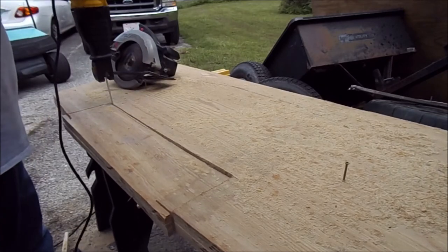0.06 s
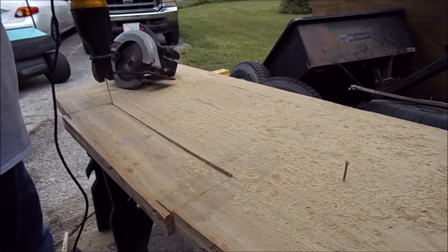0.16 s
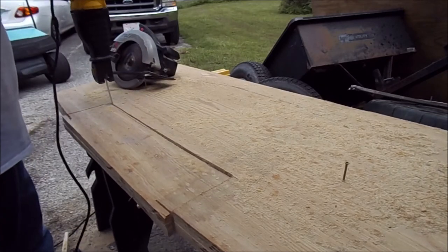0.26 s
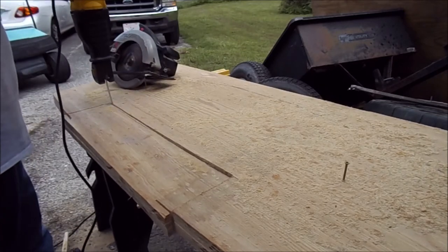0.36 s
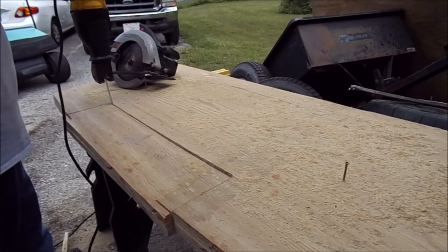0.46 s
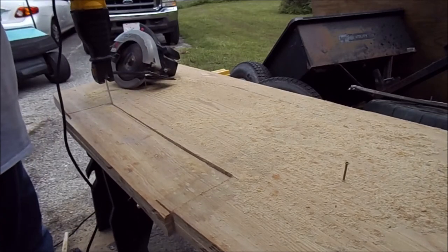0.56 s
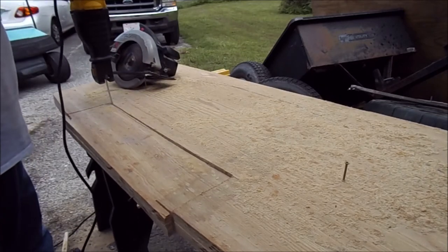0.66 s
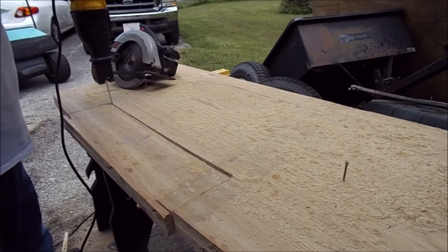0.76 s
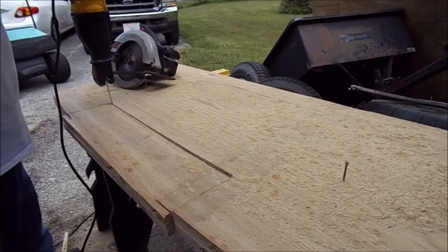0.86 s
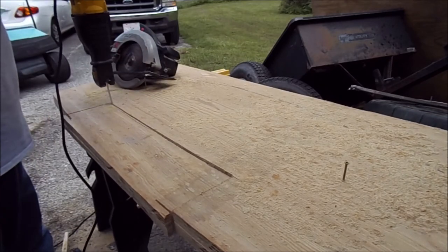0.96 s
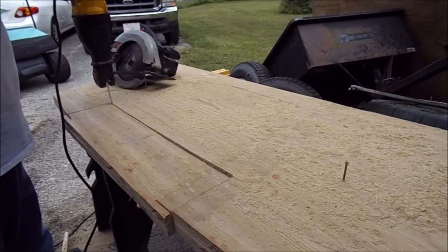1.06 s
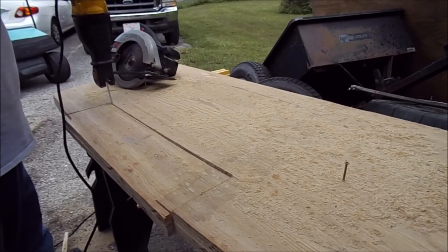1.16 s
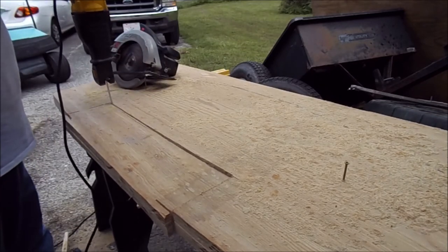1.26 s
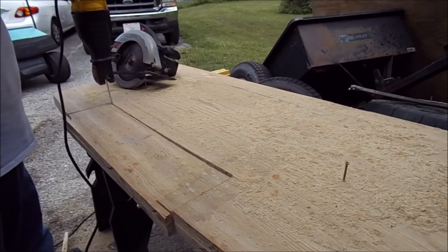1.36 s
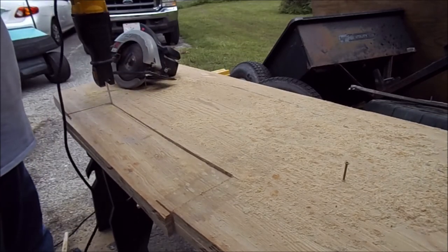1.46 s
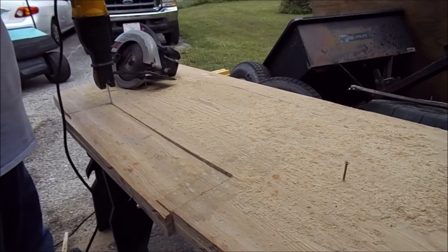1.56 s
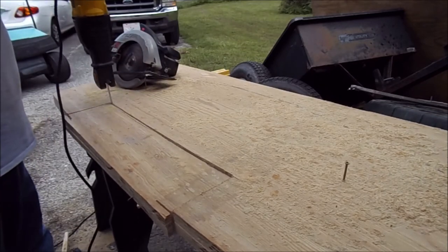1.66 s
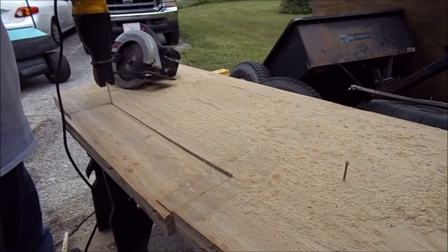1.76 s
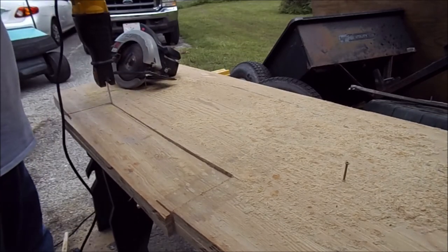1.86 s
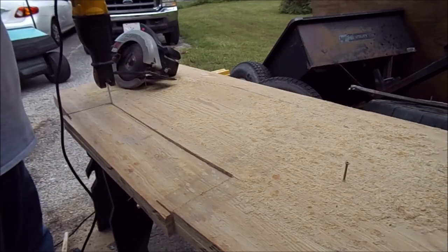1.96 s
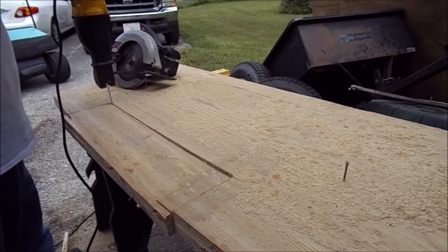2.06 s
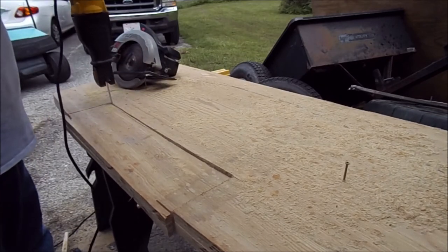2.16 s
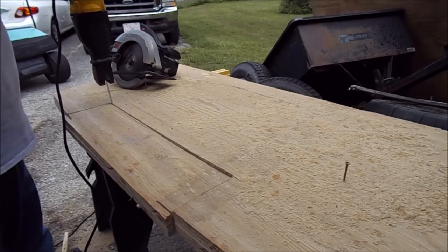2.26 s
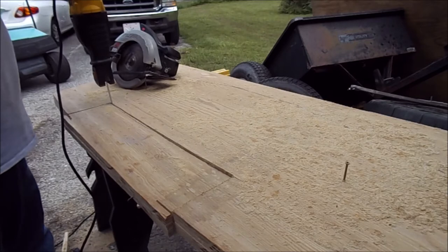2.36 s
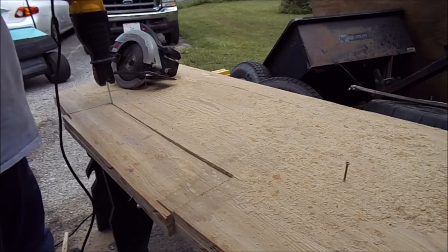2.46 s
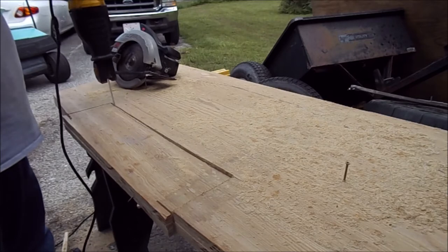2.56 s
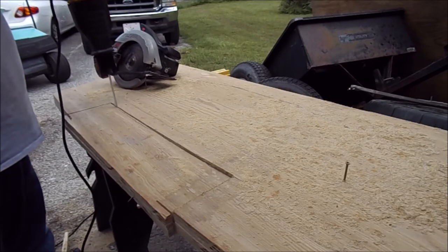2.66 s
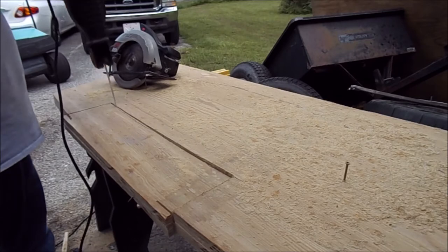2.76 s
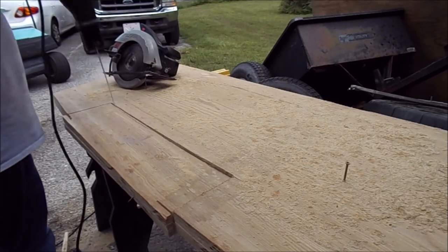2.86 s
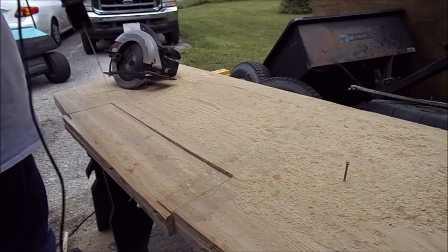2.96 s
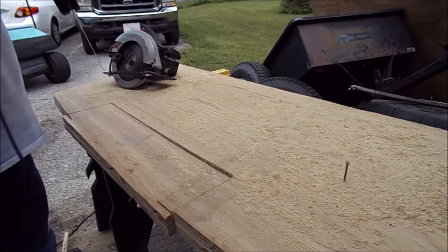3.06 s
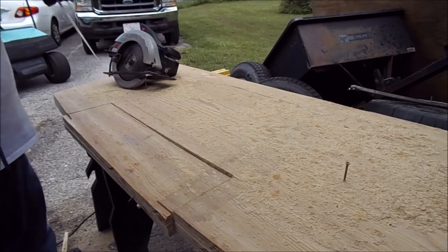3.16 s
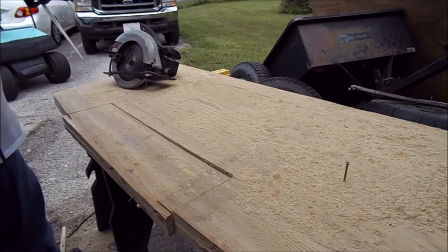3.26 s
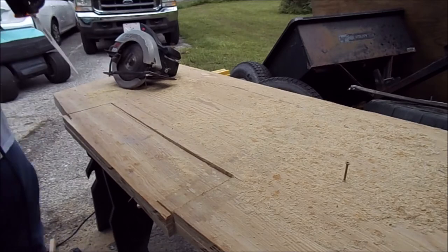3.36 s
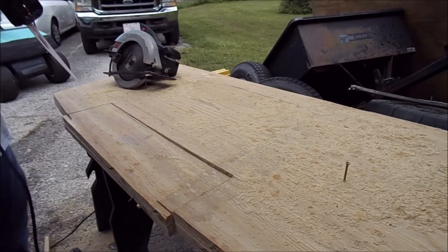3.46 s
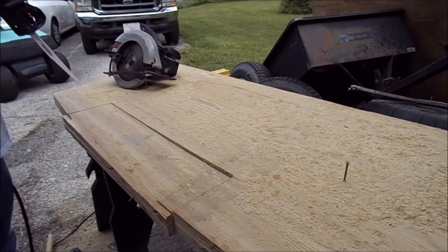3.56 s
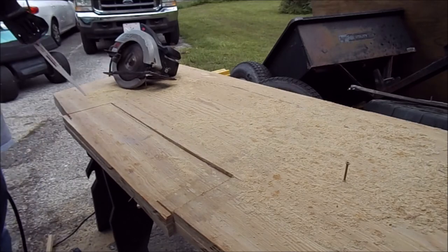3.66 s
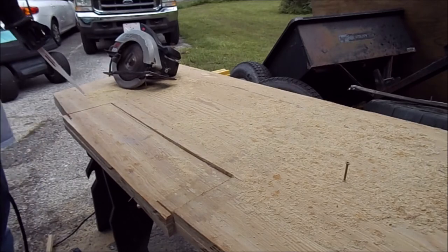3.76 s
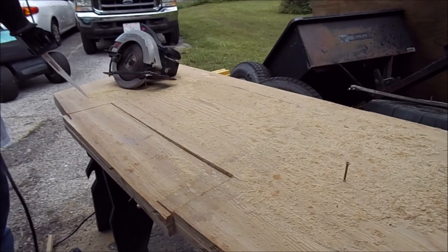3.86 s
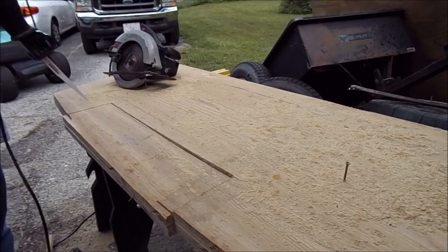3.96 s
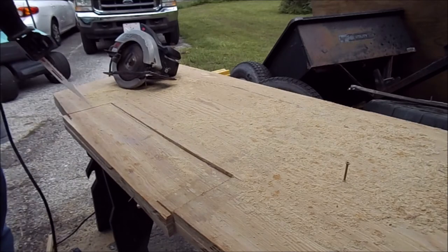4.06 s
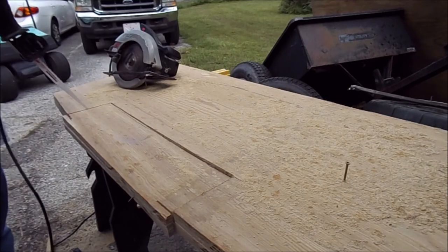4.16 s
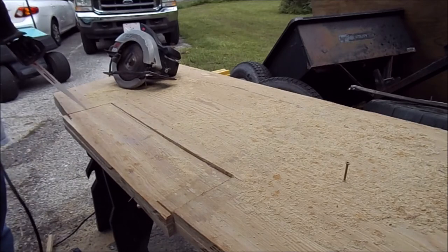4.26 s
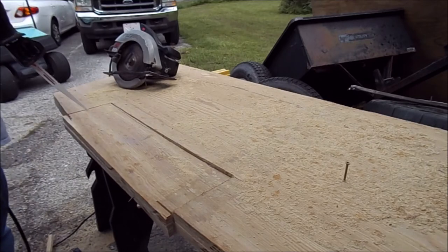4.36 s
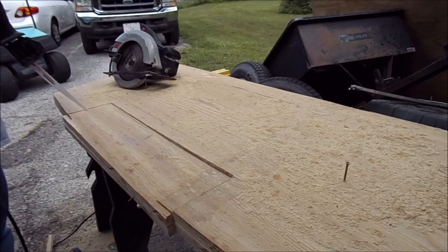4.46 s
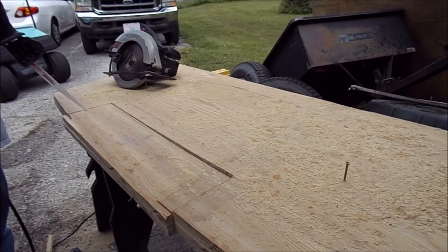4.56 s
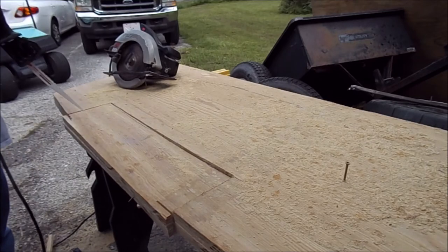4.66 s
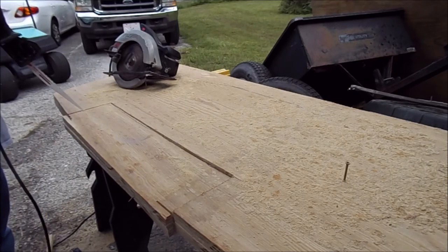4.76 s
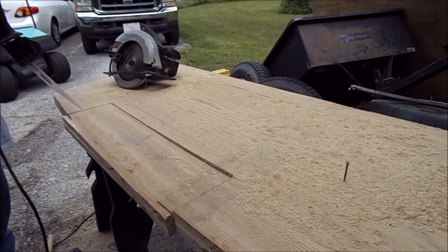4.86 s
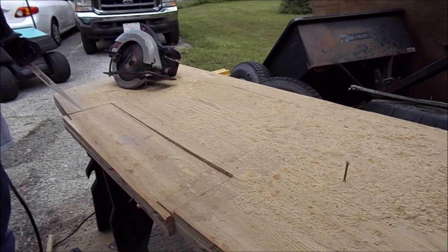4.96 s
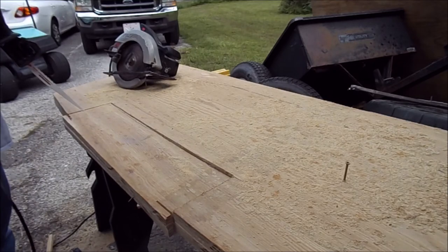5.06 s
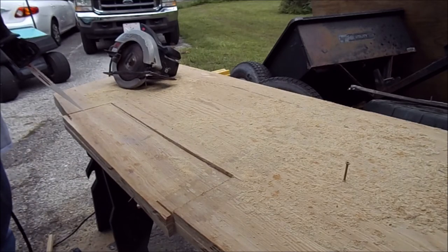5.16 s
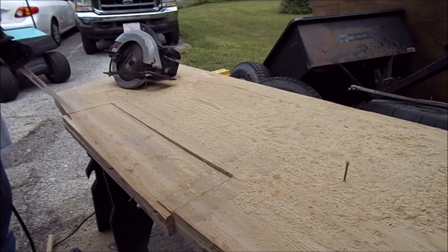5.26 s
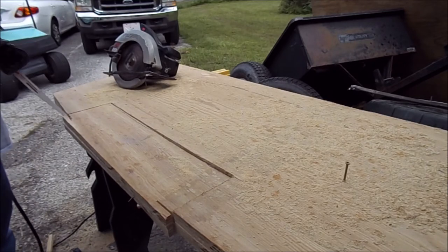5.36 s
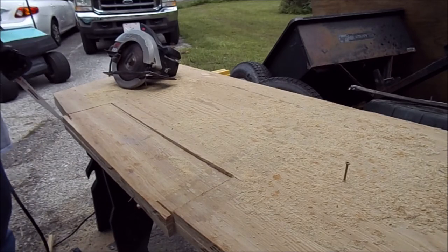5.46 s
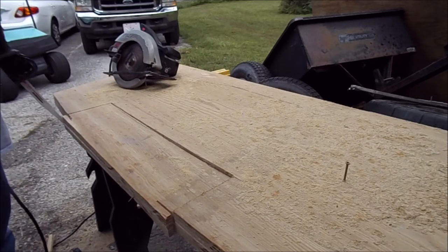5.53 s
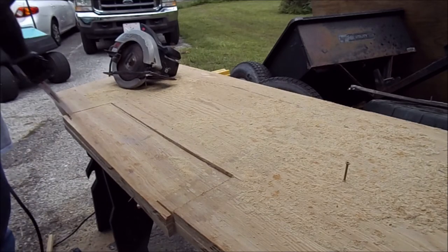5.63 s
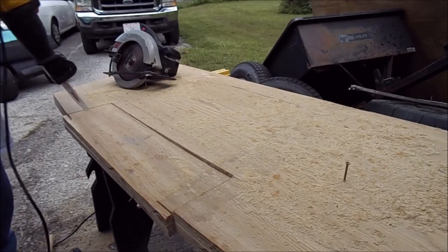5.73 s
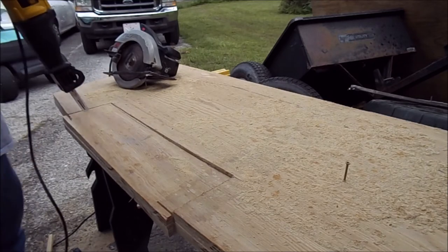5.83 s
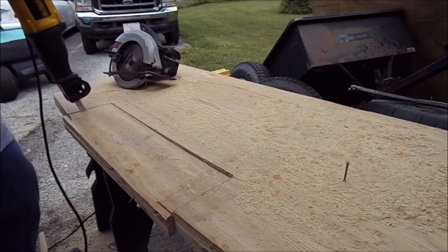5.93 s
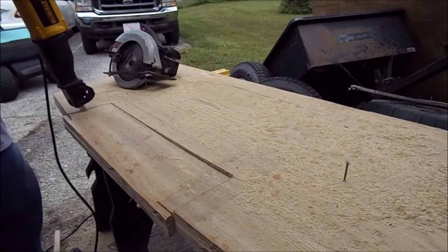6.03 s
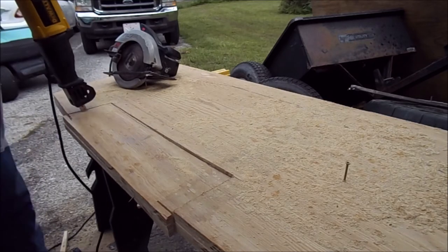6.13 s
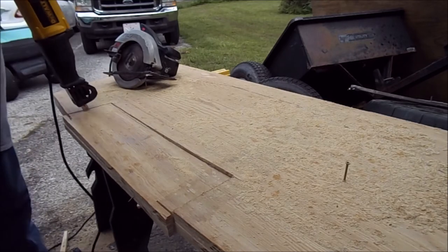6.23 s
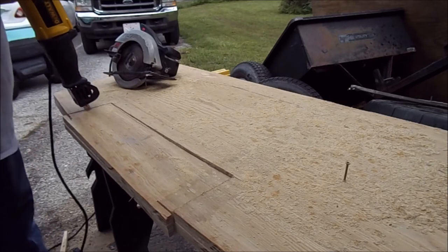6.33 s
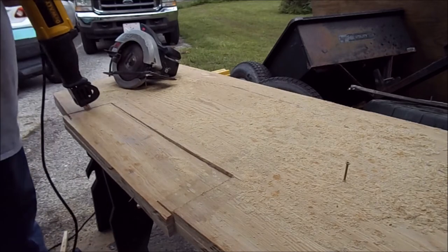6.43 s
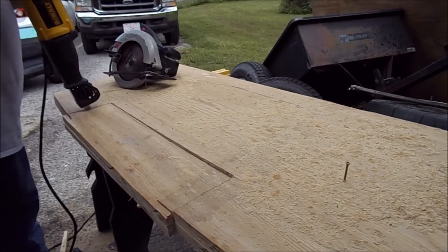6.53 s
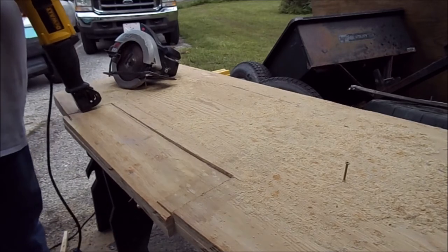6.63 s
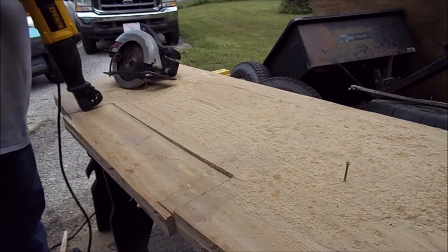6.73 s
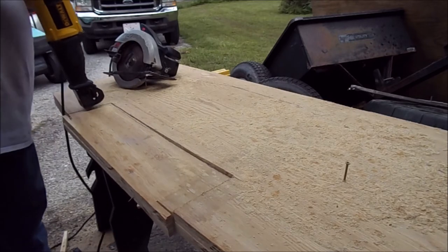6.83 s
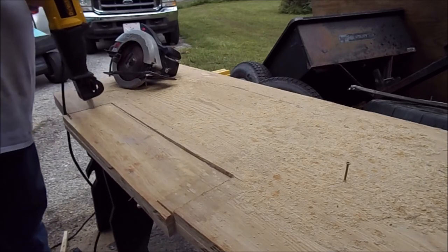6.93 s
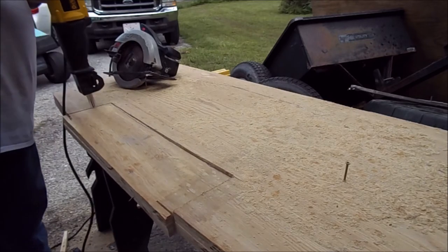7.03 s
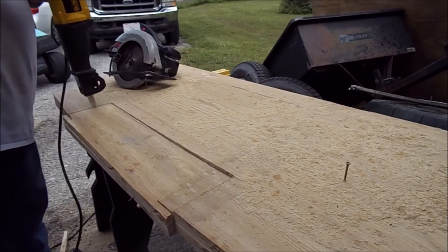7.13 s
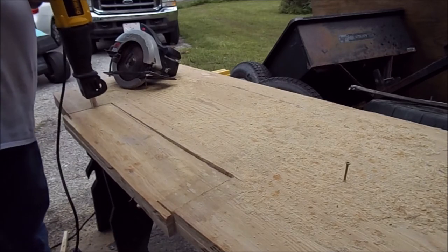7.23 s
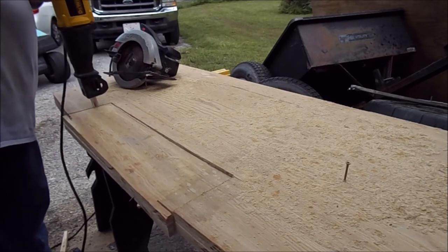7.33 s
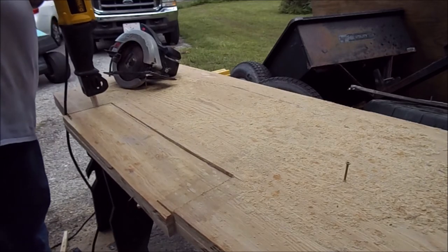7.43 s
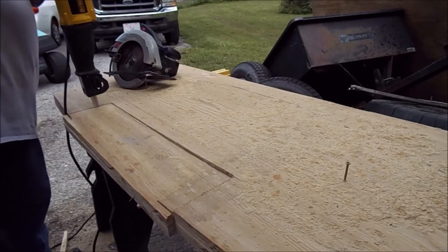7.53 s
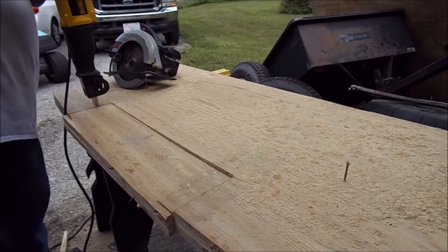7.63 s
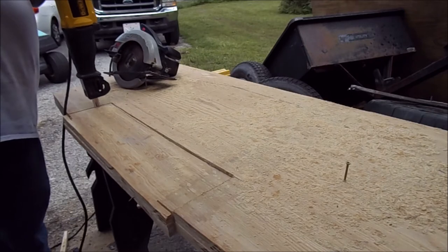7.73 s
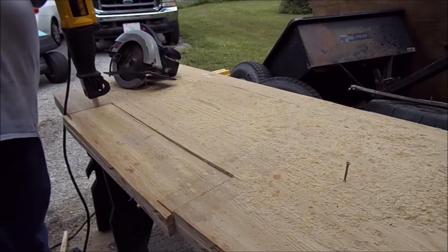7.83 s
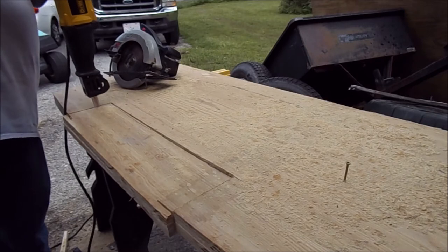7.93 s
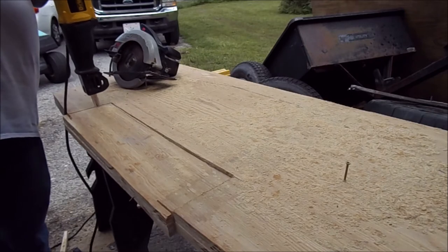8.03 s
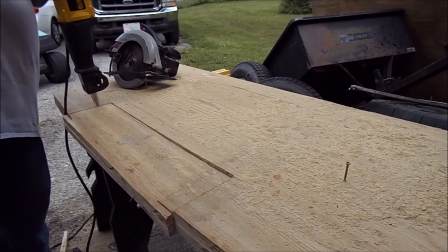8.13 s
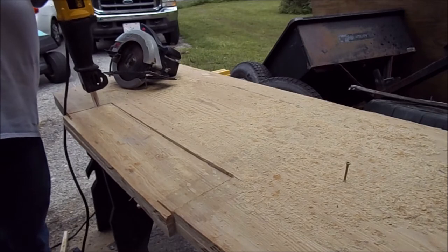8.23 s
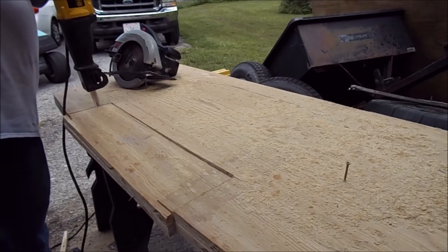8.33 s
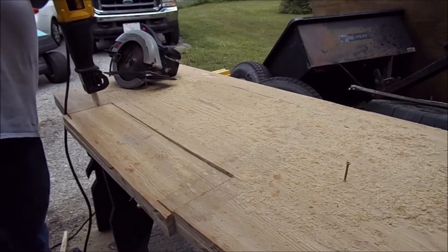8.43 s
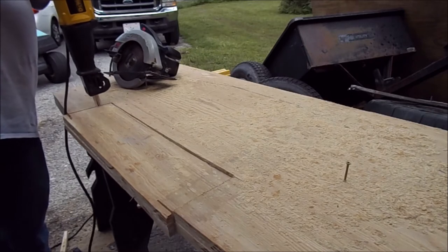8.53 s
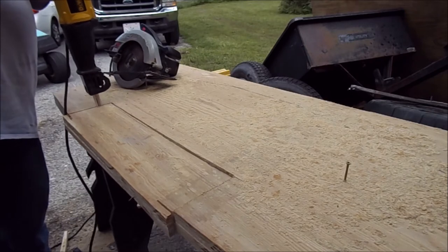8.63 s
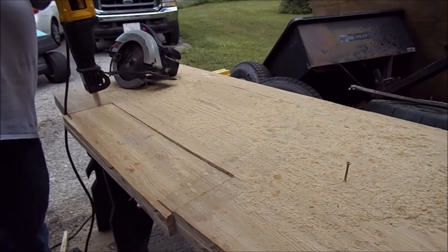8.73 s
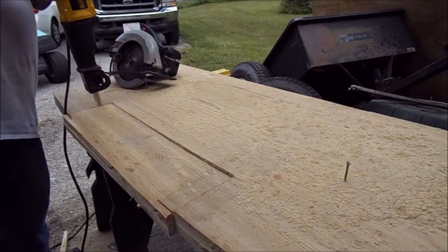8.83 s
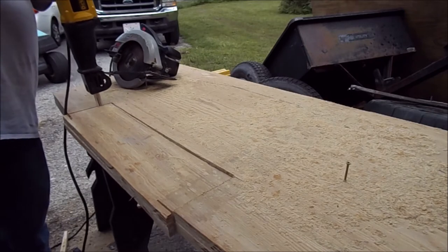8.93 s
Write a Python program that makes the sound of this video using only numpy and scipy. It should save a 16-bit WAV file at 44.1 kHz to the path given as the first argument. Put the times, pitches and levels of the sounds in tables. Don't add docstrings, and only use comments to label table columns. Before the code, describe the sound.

Outdoors and very close, harsh electric saw cutting of a plywood sheet stops, leaving light woody taps and scuffs before loud sawing abruptly resumes.

```python
import sys
import numpy as np
from scipy import signal
from scipy.io import wavfile
from scipy.ndimage import uniform_filter1d

SR = 44100
rng = np.random.default_rng(int(sys.argv[2]) if len(sys.argv) > 2 else 0)


def file_out(sig):
    cols = np.atleast_2d(sig).T
    lim = np.clip(cols, -1, 1)
    pcm = np.round(lim * 32767).astype(np.int16)
    wavfile.write(sys.argv[1], SR, pcm)


def level_to_linear(level):
    exponent = np.asarray(level, float) / 20
    return 10 ** exponent


N = 396459

# f/Hz, density level/dB per Hz
WOOD_SPECTRUM = [(150, -65), (250, -23), (493, -0.5), (1170, 2), (1790, 1), (3210, -2.5), (3570, -8),
                 (3870, -10.5), (6000, -23), (7800, -39), (13200, -120)]
# f/Hz, density level/dB per Hz
AIR_SPECTRUM = [(2060, -34.5), (3500, -10.5), (4190, -17), (5120, -9), (5660, -8.5), (8430, -10),
                (9730, -9.5), (10800, -13.5), (12000, -11.5), (15500, -24.5)]
# f/Hz, width/Hz, level/dB
BLADE_MODES = [(1800, 300, 2), (3000, 400, 2), (4100, 400, -4)]
TRIGGER_ON_S, TRIGGER_OFF_S = (-.356, 6.475), 2.355
FULL_HZ = 3900
CONTACT = np.arange(600) / 60.


def evened(x):
    return x / np.sqrt(np.mean(x ** 2) + 1e-20)


def steadied(x):
    return x / np.sqrt(abs(uniform_filter1d(x ** 2, size=11025)) + 1e-12)


def along(points):
    s, *columns = np.transpose(points)
    return [np.interp(np.arange(N) / SR, s, c) for c in columns]


def colour(x, points=None, peaks=(), peak_db=0):
    hz = abs(np.fft.fftfreq(8192, 1 / SR))
    gain = np.zeros(len(hz)) + 1e-5
    if points:
        f, db = np.transpose(points)
        curve_db = np.interp(np.log(hz + 1), np.log(f + 1), db)
        bass_loss_db = 47 * np.log10(np.maximum(f[0] / (hz + 1), 1))
        gain += level_to_linear(curve_db - bass_loss_db)
    for f, width, db in peaks:
        gain += level_to_linear(db + peak_db) / (1 + (2 * (hz - f) / width) ** 2)
    level = np.log(gain)
    phase = -signal.hilbert(level).imag
    taps = np.fft.ifft(np.exp(level + 1j * phase)).real[:4096]
    return signal.oaconvolve(x, taps)[:len(x)]


def wander(per_s):
    at = np.arange(0, N / SR + 1, 1 / per_s)
    return np.interp(np.arange(N) / SR, at, rng.standard_normal(1000)[:len(at)]) * 1.22


def clicks(per_s, spread_db):
    when, size, sign = rng.random((3, N))
    return (when < per_s / SR) * level_to_linear(-spread_db * np.log(size + 0.024)) * np.sign(sign - .5)


def passings(cycles):
    return np.diff(np.floor(cycles), prepend=0) > 0


def yard():
    # f/Hz, density level/dB per Hz
    hum_spectrum = [(21, -61), (35, -23), (60, -11), (150, -3), (249, -8), (283, -3), (330, -7), (849, 0),
                    (2410, -10), (6530, -17.5), (15500, -22.5)]
    return level_to_linear(-56 + 1.1 * wander(10)) * evened(colour(rng.standard_normal(N), hum_spectrum))


def scrape():
    # t/s, length/s, level/dB, treble minus that level/dB
    slides = [(3.963, 0.085, -29.5, -13.5), (4.097, 0.085, -49, -20), (4.279, 0.084, -47, -4.5),
              (4.42, .12, -55, -18), (5.1, .08, -59, -14), (5.143, 0.084, -47.5, -3.5),
              (5.264, 0.21, -47.5, -11), (5.535, 0.23, -48, -20), (5.69, .3, -36, -12.5),
              (6.01, .12, -44, -11.5), (6.19, .15, -45.5, -18), (6.462, 0.072, -31, -16.5)]
    rise_s, fall_s = 0.0083, 0.027
    t, wood, treble = np.arange(N) / SR, 0, 0
    for s, length, db, treble_db in slides:
        rise = np.clip((t - s) / rise_s, 0, 1)
        press = rise * np.exp(-np.maximum(t - s - length, 0) / fall_s)
        wood = wood + level_to_linear(db - 7.5) * press
        treble = treble + level_to_linear(db - 10 + treble_db) * press
    grains = clicks(1100, spread_db=2.5) + 0.2 * rng.standard_normal(N)
    return wood * evened(colour(grains, WOOD_SPECTRUM)) + treble * evened(colour(grains, AIR_SPECTRUM))


def knocks():
    # t/s, peak level/dB, f/Hz, treble minus peak/dB
    taps = [(3.169, -12, 2170, -20.5), (3.699, -33.5, 1220, -19), (3.777, -22.5, 1460, -20),
            (3.818, -26, 1270, -26), (4.17, -43, 1110, -24), (4.22, -30.5, 1010, -32),
            (4.271, -42, 2200, -6), (4.303, -23, 2870, -17), (4.414, -34.5, 2370, -28),
            (4.547, -36, 1400, -8), (4.576, -18, 1000, -22.5), (5.72, -16.5, 1880, -12.5),
            (5.971, -22, 1990, -30), (6.086, -24, 2880, -15), (6.133, -38, 1500, -25),
            (6.167, -32, 2250, -25), (6.272, -27.5, 2200, -33), (6.31, -31, 2280, -29),
            (6.426, -40, 1480, -11), (6.455, -18.5, 1980, -18)]
    # t/s, peak level/dB, f/Hz, treble minus peak/dB
    scuffs = [(4.296, -25.5, 2860, -13), (4.327, -27, 3460, -18), (4.337, -42, 3230, -24),
              (5.115, -49, 999, -4.5), (5.177, -25.5, 1440, -11), (5.362, -29.5, 1520, -26),
              (5.399, -38, 1810, -15), (5.439, -35, 1170, -4), (5.708, -21, 2020, -14.5),
              (5.739, -29, 853, -20), (5.76, -21, 1700, -23), (5.783, -14, 1800, -28),
              (5.787, -19, 2970, -22), (5.824, -26, 1810, -27), (5.88, -24.5, 1800, -28),
              (5.895, -19.5, 3400, -18), (5.91, -24, 1710, -22), (5.929, -25, 1500, -22.5),
              (5.944, -24.5, 2170, -22.5), (6.058, -28, 566, -27), (6.192, -39, 689, -23),
              (6.218, -36, 1420, -23), (6.49, -23, 2390, -17), (6.53, -11.5, 1940, -27)]
    # t/s, peak level/dB
    thuds = [(2.62, -36), (2.77, -39), (4.02, -50), (5.74, -41), (5.8, -42), (6.06, -55), (6.56, -31)]
    tap_s, scuff_s, ring_t60_s = 0.00063, 0.0036, 0.031
    thud_hz, thud_t60_s = 220, .06
    out, t = np.zeros(N + SR), np.arange(6000) / SR
    touches = [(*row, tap_s) for row in taps] + [(*row, scuff_s) for row in scuffs]
    for (s, db, hz, treble_db, contact_s), noise in zip(touches, rng.standard_normal((60, 2, 6000))):
        touch = noise[0] * t * np.exp(-t / contact_s)
        modes = BLADE_MODES + [(hz, 2.2 / ring_t60_s + 120, 12)]
        ring = colour(touch, WOOD_SPECTRUM, modes, peak_db=2)
        tick = colour(touch, AIR_SPECTRUM)
        fade = level_to_linear(-17.5 - 60 * t / (4.5 * ring_t60_s)) * np.minimum(t / 0.0026, 1)
        tail = evened(colour(noise[1], WOOD_SPECTRUM)) * fade
        sound = ring / abs(ring).max() + level_to_linear(treble_db) * tick / abs(tick).max() + tail
        out[round(s * SR):][:len(t)] += level_to_linear(db) * sound
    for s, db in thuds:
        fade = level_to_linear(db - 60 * t / thud_t60_s) * np.minimum(t / .006, 1)
        out[round(s * SR):][:len(t)] += fade * np.sin(2 * np.pi * thud_hz * t)
    return out[:N]


def speed():
    # t/s, commutator bars passing a brush f/Hz
    held_speed = [(0.9, 3765), (1.3, 3792), (2.2, 3934), (7.9, 3960), (8.2, 4006), (8.5, 3927),
                  (8.99, 3891)]
    spin_up_s, coast_s, dry_drag_hz = .17, 2.08, 2660
    kerf_s, kerf_length_s, kerf_loss_hz = 2.7, .16, 120
    t, held = np.arange(N) / SR, along(held_speed)[0]
    since = t - np.where(t < TRIGGER_ON_S[1], *TRIGGER_ON_S)
    driven = held * (1 - np.exp(-since / spin_up_s))
    coasting = (held + dry_drag_hz) * np.exp(-(t - TRIGGER_OFF_S) / coast_s) - dry_drag_hz
    coasting -= kerf_loss_hz * np.exp(-((t - kerf_s) / kerf_length_s) ** 2)
    released = (t > TRIGGER_OFF_S) & (t < TRIGGER_ON_S[1])
    return np.maximum(np.where(released, coasting, driven), 90)


def levels(bar_hz, load):
    # level/dB at full speed and load, slope/dB per decade, loss/dB unloaded,
    # gain/dB in the second cut
    loudness = [
        (-9, 31.5, 4, 0),
        (-17, 24.5, 0, -7.5),
        (-21.5, 39, -1, 1.5),
    ]
    # t/s, level/dB
    bite = [(0, -1), (0.2, 2), (1.7, -1), (2.12, -10), (2.8, -10), (6.5, 0.5), (7.8, -1.5), (8.99, 1.5)]
    # t/s, gear case level/dB, sheet level/dB
    snags = [(0.019, 3.5, 4), (.72, 1, 2), (.85, 5.5, -3), (1.299, 0, 6.5), (1.96, -2, 10),
             (2.055, -2.5, 12.5), (2.774, 9, 13.5), (3.11, -2.5, 4), (6.534, 13.5, 1), (6.58, 9, 7),
             (6.603, 12.5, 5), (6.648, 4.5, 0.5), (6.685, 11.5, -5), (6.724, 7.5, -1.5), (6.757, 1, 0.5),
             (6.78, 1, 5), (6.82, 1, 0), (6.852, 1, -0.5), (6.881, 2, 4), (6.911, 1.5, 1), (6.94, 3, 5),
             (8.4, 0, 6.5), (8.67, 2, 6), (8.77, 2, 5)]
    snag_s = [
        [0.0078],
        [0.016],
    ]
    t = np.arange(N) / SR
    case, sheet, air = (db + per * np.log10(bar_hz / FULL_HZ) - free * (1 - load)
                        + second * (t > TRIGGER_ON_S[1]) for db, per, free, second in loudness)
    swell = sum(np.c_[db] * np.exp(-((t - s) / snag_s) ** 2) for s, *db in snags)
    return case + swell[0], sheet + swell[1] + along(bite)[0], air


def motor(bars, bar_hz, load, jolt, rattle):
    # f/Hz, width/Hz, level/dB
    vents = [(4700, 700, 2), (6200, 900, 6), (7500, 700, -1), (9300, 1000, -1), (10800, 600, 1),
             (11700, 800, -4)]
    # multiple of the commutator rate, level/dB
    gear_orders = [(2.35, -1), (2.43, 4), (2.52, 2), (2.963, 3), (3.05, -2), (3.135, -4)]
    flow = (1 + 1.5 * load * jolt) * level_to_linear(0.31 * wander(80)) * rng.standard_normal(N)
    hiss = steadied(colour(flow + 0.23 * load * rattle, AIR_SPECTRUM))
    tones = 0
    for k in range(2, 17):
        if k != 3:
            strength = level_to_linear(2.5 * wander(12) - 1) * (k * bar_hz < 15000) * (1 + .5 * (k == 6))
            tones = tones + strength * np.sin(2 * np.pi * k * bars)
    strain = np.minimum(bar_hz / 3000, 1) ** 2 * (0.52 + 0.3 * load)
    for k, db in gear_orders:
        tones += strain * level_to_linear(db + 3 * wander(14)) * np.sin(2 * np.pi * k * bars + 1.6 * wander(90))
    whine_db = -12 + 6 * (1 - bar_hz / FULL_HZ)
    return hiss + level_to_linear(whine_db) * colour(tones, peaks=vents)


def stroke_thump(strokes, bar_hz, load):
    # multiple of the stroke rate, level/dB
    stroke_orders = [(3, -47), (4, -52), (5, -42), (6, -48), (7, -43), (8, -52), (9, -44), (10, -45),
                     (11, -46), (12, -44), (13, -40), (14, -39), (16, -36), (18, -34)]
    tones = sum(level_to_linear(db + 1.2 * wander(6)) * np.sin(2 * np.pi * k * strokes) for k, db in stroke_orders)
    return load ** 1.5 * (bar_hz / FULL_HZ) ** 3 * tones


def plywood_sheet(drive, strokes, bar_hz, load, jolt, first):
    # f/Hz, width/Hz, level/dB
    sheet_modes = [
        [(495, 8, 0), (569.4, 13, 3), (664, 39, -3), (758, 26, 1.5)],
        [(488.6, 13, -3), (554, 18, -1), (651, 23, 7.5), (729, 55, -7)],
    ]
    # f/Hz, density level/dB per Hz
    sheet_spread = [(24, -70.5), (40, -64), (181, -28), (289, -12), (564, -7.5), (679, -5), (750, 1),
                    (983, -5), (1200, -4.5), (1560, -33.5), (2640, -120)]
    kicks = passings(strokes + .015 * wander(20)) * level_to_linear(2.5 * wander(25))
    chatter = clicks(bar_hz * .3 * (0.44 + jolt), spread_db=-2.5)
    shake = 0.43 * load * evened(kicks) + evened(chatter)
    ringing = np.where(first, *(colour(shake, sheet_spread, p, peak_db=9) for p in sheet_modes))
    unloaded = colour(colour(drive, sheet_spread), WOOD_SPECTRUM)
    return steadied(load * evened(ringing) + (1 - load) * evened(unloaded))


def gear_drive(bars, bar_hz, load, jolt):
    turns = passings(bars / 11.5 + .15 * wander(70))
    extra_per_s = 110 + bar_hz * .12 * (.6 + load * np.minimum(jolt, 2))
    clacks = turns + .7 * abs(clicks(extra_per_s, spread_db=0))
    clacks = clacks * level_to_linear((1.5 + load) * wander(90))
    bursts = signal.oaconvolve(clacks, CONTACT * np.exp(-CONTACT))[:N]
    rattle = steadied(bursts * rng.standard_normal(N))
    tear = evened((.6 + (.2 + .9 * load) * jolt) * rng.standard_normal(N))
    dry_bursts = signal.oaconvolve(clacks, np.exp(-CONTACT / .9))[:N]
    ticking = steadied(dry_bursts * rng.standard_normal(N))
    drive = .6 * load * rattle + .8 * (1 - load) * ticking + tear * (.45 + .45 * load)
    return rattle, drive


def gear_case(drive, loose, load, first):
    # f/Hz, density level/dB per Hz
    case_spectra = [
        [(470, -44), (800, -11), (1240, -17.5), (1380, -6), (1580, -9.5), (1970, -1.5), (2860, -8), (3560, -10.5), (4540, -17.5), (6000, -24.5), (7800, -45), (13200, -120)],
        [(290, -56.5), (500, -13), (669, -8), (841, 5.5), (1650, 5.5), (2480, 4.5), (2780, -9), (3180, -2.5), (3800, -5), (6000, -10), (7800, -11.5), (13200, -120)],
        [(470, -54.5), (800, -10.5), (939, -5), (1070, -10), (1240, -3), (1570, -4.5), (2310, -0.5), (3010, -1), (4700, -14.5), (6000, -24.5), (7800, -45), (13200, -120)],
    ]
    # f/Hz, width/Hz, level/dB
    case_peaks = [
        [(1151, 54, -7), (1400, 64, -3), (1980, 70, -16), (2290, 18, 5), (3120, 15, -5.5), (3470, 270, -9.5)],
        [(1080, 250, -7.5), (1550, 260, -9), (2550, 300, 12.5), (3094, 190, 10.5)],
        [(1420, 30, -5.5), (2376, 68, -1.5), (3070, 39, -10.5), (3580, 74, 5.5), (4600, 54, -24)],
    ]
    slap_db = -21.5, -11
    cut, coast, recut = (evened(colour(drive, c, p, peak_db=-8.0))
                         for c, p in zip(case_spectra, case_peaks))
    case = steadied(np.where(first, load * cut + (1 - load) * coast, recut))
    reversals = passings(2 * loose) * level_to_linear(4.9 * wander(70))
    slap = signal.oaconvolve(reversals, np.exp(-CONTACT / 0.8))[:N] * rng.standard_normal(N)
    return case + load * level_to_linear(np.where(first, *slap_db)) * evened(colour(slap, peaks=BLADE_MODES[1:]))


def saw():
    # t/s, share 0-1
    load_curve = [(0, 1), (2.3, 1), (2.85, 0.11), (6.5, 0.4), (6.9, 0.97), (9, 1)]
    first = np.arange(N) / SR < 5
    running = along([(0, 1), (4.06, 0.92), (4.09, 0.01), (6.52, 0.01), (6.535, 0.94), (9, 0.96)])[0]
    bar_hz, load = speed(), np.clip(along(load_curve)[0], 0, 1)
    case_db, sheet_db, air_db = levels(bar_hz, load)
    bars = np.cumsum(bar_hz) / SR
    strokes = bars / 105.5
    loose = strokes + 0.044 * wander(30)
    pull = 1 + 0.31 * np.sign(np.sin(2 * np.pi * loose))
    jolt = np.exp(-(2 * loose % 1) / .3) * pull * level_to_linear(2.1 * wander(60))
    rattle, drive = gear_drive(bars, bar_hz, load, jolt)
    case = level_to_linear(case_db) * gear_case(drive, loose, load, first)
    sheet = level_to_linear(sheet_db) * plywood_sheet(drive, strokes, bar_hz, load, jolt, first)
    air = level_to_linear(air_db) * motor(bars, bar_hz, load, jolt, rattle)
    return running * (case + sheet + air + stroke_thump(strokes, bar_hz, load))


def scene():
    close = saw() + knocks() + scrape()
    echoes = sum(level_to_linear(db) * np.pad(close, (round(s * SR), 0))[:N]
                 for s, db in [(.0047, -20), (.0131, -20.5), (.024, -13)])
    return (close + echoes + yard())[None]


def roll_off(x):
    return signal.sosfilt(signal.butter(12, 15690, fs=SR, output="sos"), x)


def record(dry):
    # t/s, share taken away 0-1
    dropouts = [(.835, .8), (1.7, .5), (2.6, .5), (2.77, .55), (4.857, .6), (5.07, .5), (5.157, .7),
                (6.155, .7), (7.29, .45), (7.845, .6), (8.035, .5), (8.21, .5), (8.355, .55)]
    clipped = dry / (1 + abs(dry / .97) ** 10) ** (1 / 10)
    coupled = signal.sosfilt(signal.butter(1, 120, "high", fs=SR, output="sos"), clipped)
    treble = signal.sosfiltfilt(signal.butter(4, 4500, "high", fs=SR, output="sos"), coupled)
    t = np.arange(N) / SR
    lost = sum(min(share, 1) * np.exp(-((t - s) / .012) ** 4) for s, share in dropouts)
    return roll_off(coupled - lost * treble)


dry = scene()
out = record(dry)
file_out(out)
```